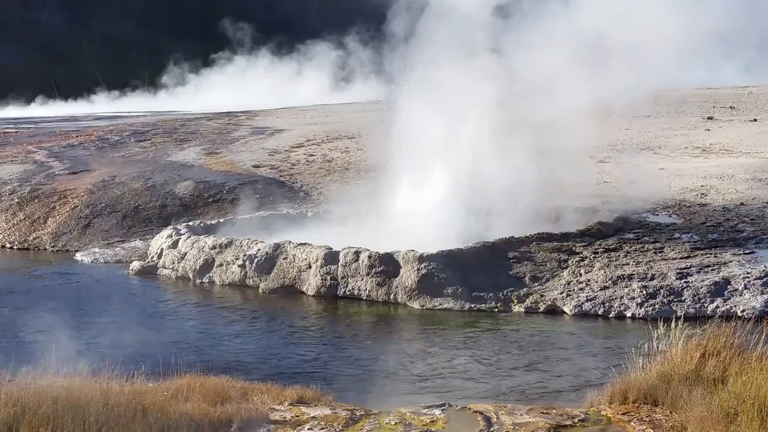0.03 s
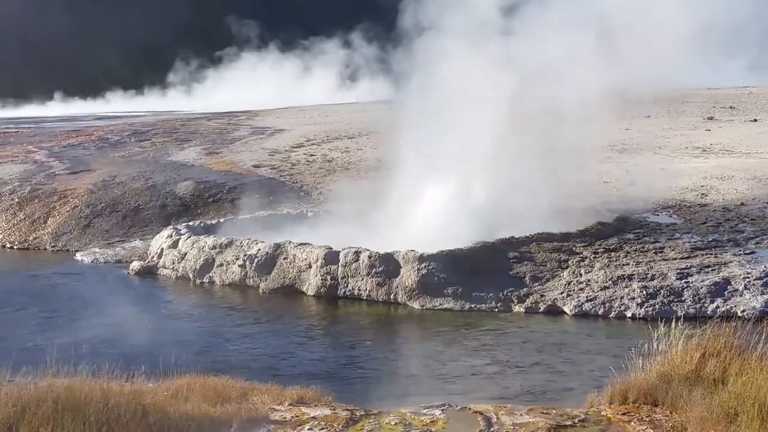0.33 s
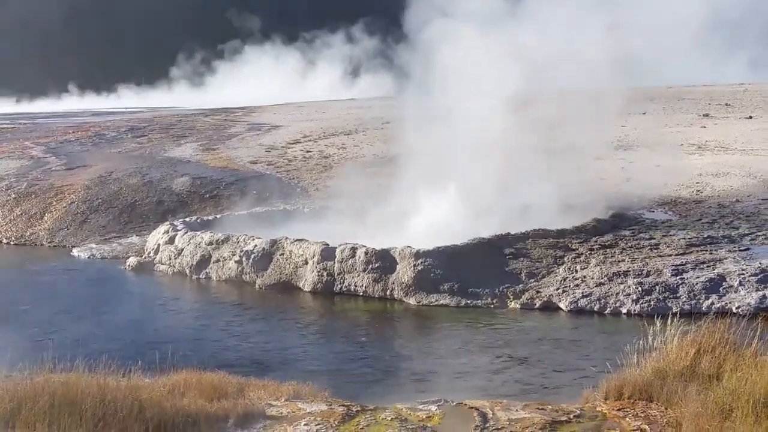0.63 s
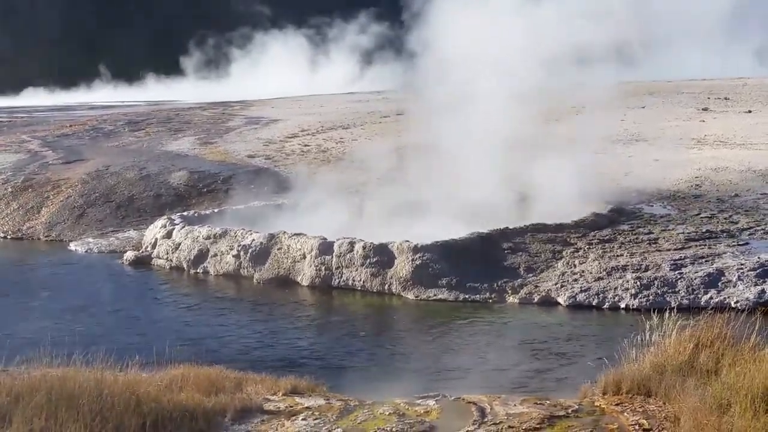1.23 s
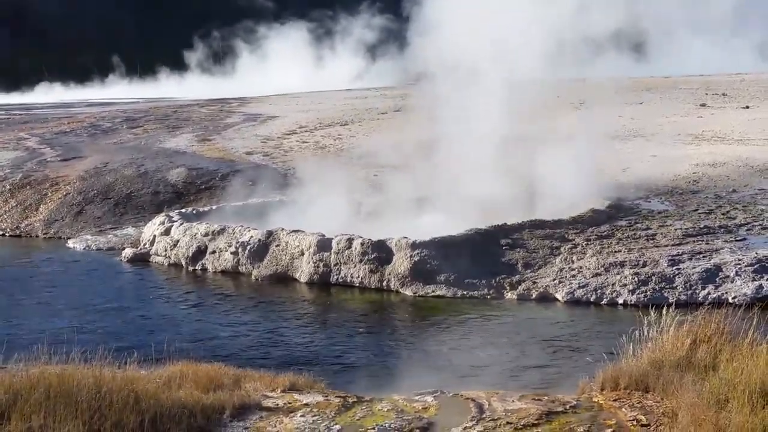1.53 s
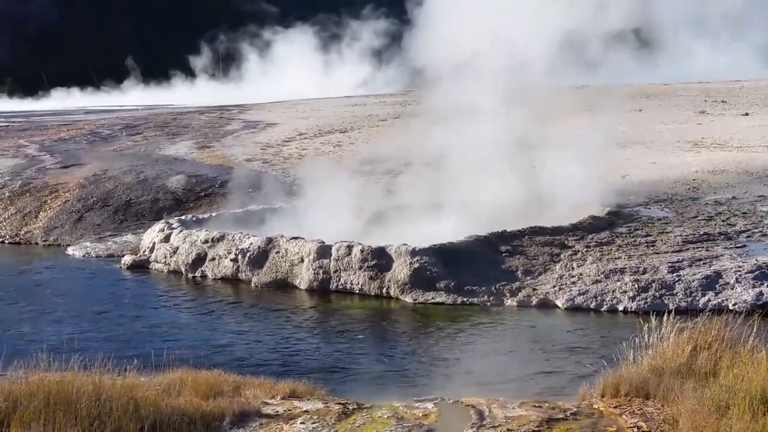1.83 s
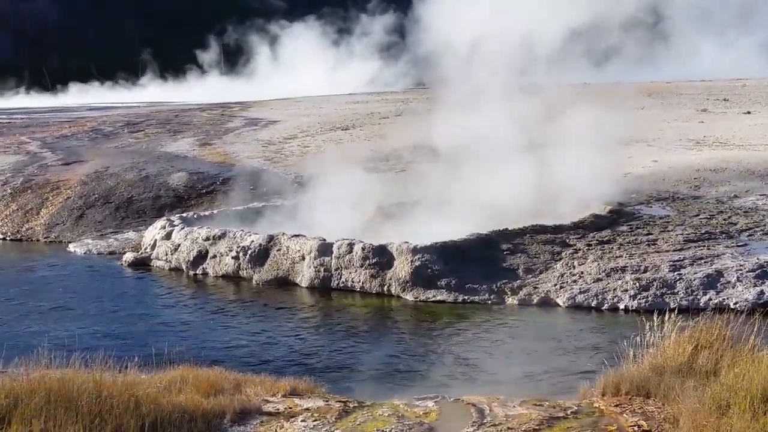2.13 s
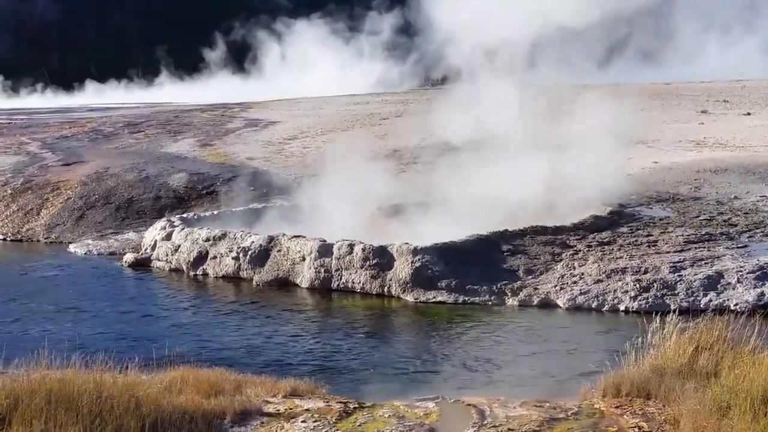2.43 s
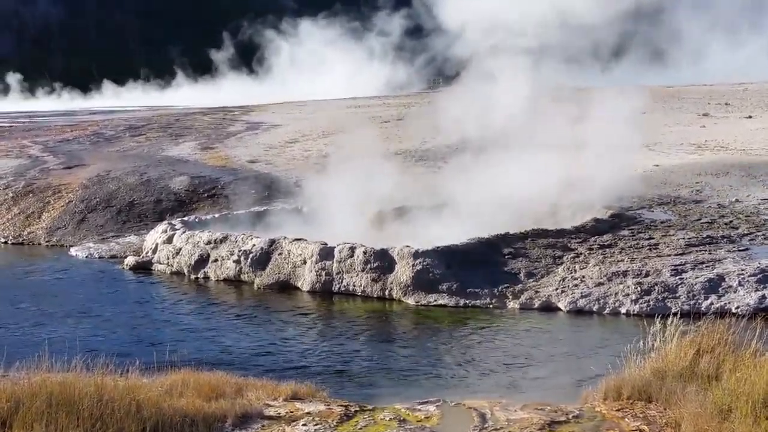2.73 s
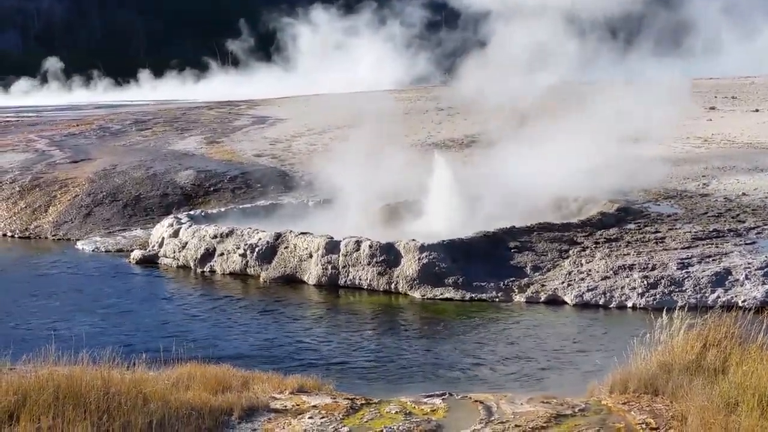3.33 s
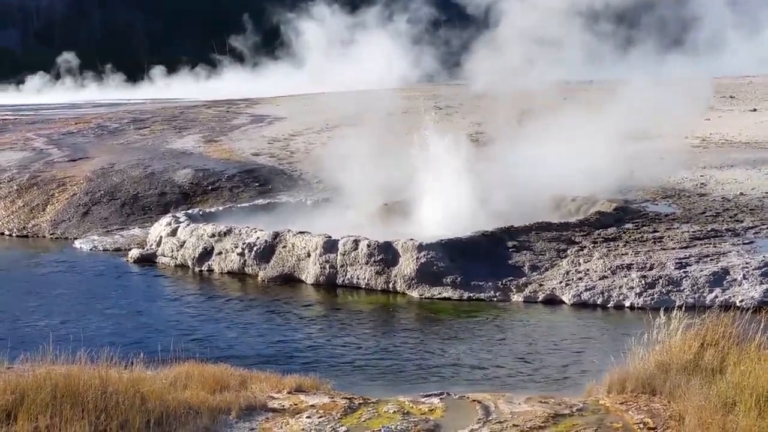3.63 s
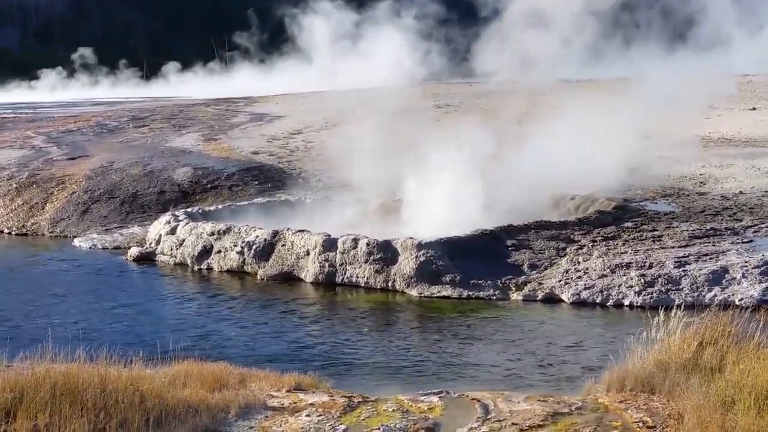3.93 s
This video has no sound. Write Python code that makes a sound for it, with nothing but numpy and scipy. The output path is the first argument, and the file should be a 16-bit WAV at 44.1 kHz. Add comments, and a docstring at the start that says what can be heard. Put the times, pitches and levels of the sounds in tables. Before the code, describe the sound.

A small geyser fades in at about 0.4 seconds, boiling and gurgling with irregular low thuds over a low drone and light wind. Bubbly water rushes throughout, mostly on the left, with splashes around 0.8 to 1.1 seconds. A thin, high sizzle with a few sharp ticks swells and sinks on the right. Near 3.3 seconds a jet throws up hissing spray, and water splashes down until 4 seconds.

```python
"""A small geyser boils in its pool beside a river, in the open; the sound fades in out of silence.
Steam pockets collapse under the water and thud over a low, steady drone and a light wind.
Water full of tiny bubbles rushes and splashes mostly on the left, and jets throw up hissing spray.
A thin, very high sizzle with a few sharp ticks swells and sinks on the right."""
import sys
import numpy as np
from scipy import signal
from scipy.fft import rfft, irfft, next_fast_len
from scipy.io import wavfile
from scipy.ndimage import uniform_filter1d, map_coordinates

SR = 44100
rng = np.random.default_rng(int(sys.argv[2]) if len(sys.argv) > 2 else 0)


def unload_audio(sound):
    """Save the sound as a 16-bit wav file, at the path given as the first command line argument."""
    columns = np.transpose(np.atleast_2d(sound))
    # keep every value between -1 and 1, then stretch to whole-number steps
    steps = np.round(np.clip(columns, -1, 1) * 32767)
    wavfile.write(sys.argv[1], SR, steps.astype(np.int16))


N = 176400


def amp(db):
    """Turn decibels into a gain."""
    return 10 ** (np.asarray(db) / 20)


def unit(x):
    """Scale to an average (rms) level of 1."""
    return x / np.sqrt(np.mean(x ** 2) + 1e-20)


def along(points, hz):
    """Read between (freq_hz, value) points on a log scale."""
    freqs, values = np.transpose(points)
    return np.interp(np.log(hz + 1), np.log(freqs + 1), values)


def curves(rows):
    """Join timed rows into one line per column."""
    times, *columns = np.transpose(rows)
    return [np.interp(np.arange(N) / SR, times, column) for column in columns]


def wobble(per_s):
    """A smooth curve through per_s random values a second."""
    return map_coordinates(rng.standard_normal(1024), [np.arange(N) * per_s / SR + 2], mode="wrap")


def filtered(x, response):
    """Give each frequency the gain response(hz)."""
    size = next_fast_len(N + SR // 2)
    return irfft(rfft(x, size) * response(np.fft.rfftfreq(size, 1 / SR)), size)[..., :N]


def shaped(x, tone):
    """Filter by a (freq_hz, gain_db) table."""
    return filtered(x, lambda hz: amp(along(tone, hz)))


def noise(tone):
    """Two separate noises with the same tone."""
    return unit(shaped(rng.standard_normal((2, N)), tone))


def spread(pair, likeness):
    """Blend two unrelated sounds into a partly alike left and right."""
    def blend(hz):
        angle = np.arccos(np.clip(along(likeness, hz), -.999, .999)) / 2
        return np.array([np.cos(angle), np.sin(angle)])
    mid, side = filtered(pair, blend)
    return np.array([mid + side, mid - side])


def patchy(depth_db):
    """Two noises that share random louder and softer patches."""
    cells = signal.stft(rng.standard_normal((2, N)), nperseg=512)[2]
    patches = uniform_filter1d(rng.standard_normal(cells.shape[1:]), size=5, axis=0)
    patches = unit(uniform_filter1d(patches, size=7, axis=1))
    return unit(signal.istft(cells * amp(depth_db * patches), nperseg=512)[1][:, :N])


def resonant(hz, width_hz, size=N):
    """Noise that rings around one pitch."""
    f = np.fft.rfftfreq(size, 1 / SR)
    resonance = 1j * f * width_hz / (hz * hz - f * f + 1j * f * width_hz)
    return unit(irfft(rfft(rng.standard_normal(size)) * resonance ** 2, size))


def decay(t, length):
    """Die away by 60 dB over the given length."""
    return np.exp(-np.log(1000) * t / length)


def bubbles(per_s, low_hz, high_hz, cycles, scatter_db, size):
    """Bubbles ring briefly, each with a random time, pitch and strength."""
    when, pitch, strength, flip = rng.random((4, int(per_s * N / SR), 1))
    hz = low_hz * (high_hz / low_hz) ** pitch
    turns = hz * np.arange(size) / SR
    gain = amp(-scatter_db * np.log(np.maximum(strength, .02))) * np.sign(flip - .5)
    rings = gain * np.sin(2 * np.pi * turns) * decay(turns, cycles) * (1 - np.exp(-2 * turns))
    at = (when * N).astype(int) + np.arange(size)
    return unit(np.bincount(at.ravel(), rings.ravel(), N)[:N])


def add(track, start_s, sound):
    """Mix a sound into a track."""
    part = track[max(round(start_s * SR), 0):][:len(sound)]
    part += sound[:len(part)]


# The wind's deep tone: freq_hz, gain_db
WIND_TONE = [(15, -7.5), (35, -1), (55, 6.5), (100, -3.5), (200, -11.5), (500, -42.5), (1500, -79.5)]

def wind():
    """A light wind buffets each side separately."""
    gusts = amp(2.5 * np.array([wobble(9), wobble(3)]))
    return amp([[-48.5], [-50]]) * gusts * noise(WIND_TONE)


# The drone's slow drift: time_s, pitch_hz, level_db
DRONE_DRIFT = [(.5, 89.5, -42), (1.1, 89.7, -41.5), (1.7, 90.3, -38.5), (2.15, 92.5, -36), (3.0, 91.3, -38),
               (3.8, 91.8, -37.5), (4.0, 94.5, -42.5)]

def drone():
    """One low tone wavers slightly."""
    hz, db = curves(DRONE_DRIFT)
    phase = 2 * np.pi * np.cumsum(hz + 0.76 * wobble(7.17)) / SR
    return unit(np.sin(phase)) * amp(db + 0.66 * wobble(10)) * amp([[-.8], [.8]])


# How the sizzle swells: time_s, relative_db
SIZZLE_SWELL = [(0.7, -49.5), (0.86, -55), (1.32, -71.5), (2.32, -65), (2.38, -62.5), (2.4, -66.5),
                (2.93, -74), (3.13, -73), (3.4, -55.5), (3.5, -61.5), (3.69, -65), (3.98, -56)]
# Sharp ticks: start_s, relative_db
TICK_HITS = [(.985, -35), (1.572, -41), (1.995, -45.5), (2.379, -45), (2.551, -40.5), (2.658, -41.5),
             (3.449, -26.5), (3.453, -21.5), (3.456, -34)]
# Tones of the sizzle and the ticks: freq_hz, gain_db
SIZZLE_TONE = [(3000, -69), (7500, -41.5), (9500, -36), (10300, -19.5), (11200, -5), (12200, 6),
               (15700, 2.5)]
TICK_TONE = [(3000, -74), (7500, -43.5), (9700, -40.5), (11200, -5.5), (13000, -4), (15500, -7)]

def sizzle():
    """A thin hiss crackles and ticks on the right; it is smoother and fainter on the left."""
    level_db, = curves(SIZZLE_SWELL)
    swell_db = level_db - level_db.mean()
    hiss = unit(shaped(patchy(depth_db=0.5), SIZZLE_TONE))
    left = hiss[0] * amp(-68.5 + 0.54 * swell_db)
    right = hiss[1] * amp(level_db + 7.5 + 1.2 * wobble(78))
    grains = bubbles(220, low_hz=11000, high_hz=15000, cycles=22, scatter_db=3.5, size=200)
    crackle = amp(-69.5 + .5 * swell_db) * unit(shaped(grains, SIZZLE_TONE))
    ticks, t = np.zeros(N), np.arange(SR // 20) / SR
    for start_s, db in TICK_HITS:
        add(ticks, start_s, amp(db) * rng.standard_normal(len(t)) * decay(t, 0.026))
    ticks = shaped(ticks, TICK_TONE)
    return np.array([left + amp(-25.5) * ticks, right + crackle + ticks])


def drop():
    """One nearby drop lands with a dry tick on the left."""
    out, t = np.zeros(N), np.arange(SR // 20) / SR
    tick = resonant(hz=2650, width_hz=550, size=len(t)) * decay(t, .028) * (1 - np.exp(-t / .002))
    add(out, start_s=3.026, sound=tick)
    return out * amp([[-41], [-52]])


# How strongly the water rushes: time_s, relative_db
FLOW_SWELL = [(.55, -57.5), (0.9, -59.5), (0.97, -57), (1.09, -57), (2.41, -55), (2.89, -57), (3.26, -56.5),
              (3.42, -54.5), (3.69, -56), (4.0, -54)]
# Its tone on each side: freq_hz, gain_db
LEFT_TONE = [(200, -23), (550, -5), (850, 0.5), (1350, -2), (1800, -5.5), (2120, -8), (2550, 0.5),
             (3050, -6.5), (3400, -2), (3680, -5), (3980, -8.5), (4400, -5.5), (4900, -10.5), (5300, -19),
             (6100, -18), (6900, -38.5), (7600, -47.5), (10000, -40.5), (12000, -67.5)]
RIGHT_TONE = [(200, -26), (550, -8), (850, -3), (1300, -8), (1750, -10.5), (2200, -14.5), (2550, -10),
              (3100, -19.5), (4100, -21), (5300, -32.5), (6000, -36), (7000, -41.5), (10000, -44),
              (12000, -59.5)]
# How alike the sides are: freq_hz, likeness (0 to 1)
RUSH_LIKENESS = [(300, 0), (750, .78), (1250, 0.42), (1900, 0), (3000, 0.068), (6000, 0)]
# Narrow microphone resonances that colour the rushing water on the left: pitch_hz, width_hz, level_db
MIC_RESONANCES = [(1804, 220, -63), (2495, 330, -65.5), (4021, 313, -59)]

def rushing(surge):
    """Falling and flowing water hisses, thick with tiny bubbles."""
    flow_db, = curves(FLOW_SWELL)
    spatter = [bubbles(1100, low_hz=500, high_hz=6500, cycles=12, scatter_db=3, size=600)
               for _ in range(2)]
    spatter = unit(shaped(spatter, [(400, -23.5), (6500, -10)]))
    bubble_share = 0.12
    froth = np.sqrt(1 - bubble_share) * rng.standard_normal((2, N)) + np.sqrt(bubble_share) * spatter
    left, right = spread(froth, RUSH_LIKENESS)
    water = unit(np.array([shaped(left, LEFT_TONE), shaped(right, RIGHT_TONE)]))
    water *= amp(flow_db + 2.5 + surge * np.array([[.6], [1]]))
    mic_colour = sum(amp(db) * resonant(hz, width_hz) for hz, width_hz, db in MIC_RESONANCES)
    water[0] += amp(flow_db - flow_db.mean()) * mic_colour
    return water


# Water splashing back down: peak_s, length_s, level_db, pitch_hz, width_hz
FALLING_WATER = [(0.77, 0.2, -56.5, 820, 533), (1.083, .1, -58.5, 750, 400), (2.9, 0.1, -70, 875, 416.7),
                 (3.44, 0.055, -53.5, 1150, 756), (3.9, 0.12, -58, 1293, 600)]

def gushes():
    """Each mass of falling water swells and sinks with its own hollow tone."""
    out, t = np.zeros(N), np.arange(SR // 2) / SR - .25
    for peak_s, length_s, db, hz, width_hz in FALLING_WATER:
        swell = amp(db) * np.exp(-(2 * t / length_s) ** 2)
        add(out, peak_s + t[0], swell * resonant(hz, width_hz, size=len(t)))
    return out * amp(1.5 * wobble(45)) * amp([[1.5], [-1.5]])


# The first jet's hollow ring: time_s, pitch_hz, level_db
RING_ARCH = [(.5, 1288, -60), (.68, 1415, -58.5), (.87, 1602, -61), (1.0, 1400, -57), (1.15, 1228, -72.5),
             (1.3, 1215, -100)]

def jet_ring(width_hz=180):
    """A narrow band of splashing rises and falls in pitch with the first jet."""
    hz, db = curves(RING_ARCH)
    flutter = filtered(rng.standard_normal((2, N)), lambda f: 1 / (1 + (f / width_hz) ** 2))
    phase = 2 * np.pi * np.cumsum(hz) / SR
    ring = unit(flutter[0] * np.cos(phase) + flutter[1] * np.sin(phase))
    return amp(db) * ring * amp([[2], [-2]])


# Spray thrown up by the jets: time_s, left_level_db
SPRAY_SWELL = [(.5, -71), (.9, -67.5), (1.3, -84.5), (1.9, -81.5), (2.33, -67.5), (2.8, -83.5), (3.1, -88),
               (3.27, -60.5), (3.4, -56.5), (3.455, -58), (3.5, -65), (3.8, -69.5)]
# Its tone: freq_hz, gain_db
SPRAY_TONE = [(1500, -42), (3500, -1.5), (4500, 3.5), (6200, -2), (7000, -12.5), (7700, -34.5),
              (11000, -51)]

def jet_spray():
    """Each jet hisses as it rises, mostly on the left."""
    level_db, = curves(SPRAY_SWELL)
    return amp(level_db) * noise(SPRAY_TONE) * amp([[0], [-16]])


# Large steam pockets: start_s, level_db, pitch_hz
BIG_POCKETS = [(.592, -30, 144), (0.737, -37, 157), (0.87, -25.5, 139), (0.891, -22, 85.2),
               (1.079, -29, 266.6), (1.38, -30.5, 202), (1.529, -26, 195), (1.847, -24.5, 144),
               (1.998, -26.5, 194.5), (2.125, -29, 130.7), (2.5, -30.5, 131.6), (3.124, -33, 152.7),
               (3.25, -27.5, 130), (3.463, -37.5, 110), (3.491, -32, 168), (3.51, -27.5, 335),
               (3.531, -28, 80.7), (3.891, -30.5, 141.6)]

def steam_thuds(ring_cycles=12.6, attack_s=0.0026):
    """Each large steam pocket collapses with a low ring and a faint splash."""
    out, t = np.zeros(N), np.arange(SR // 5) / SR
    splash_tone = [(100, -17.5), (300, -0.5), (900, 11.5), (2000, -21.5), (6000, -61)]
    splash = amp(-28.5) * noise(splash_tone)[0]
    for start_s, db, hz in BIG_POCKETS:
        thud = np.sin(2 * np.pi * hz * t) + np.roll(splash, -round(start_s * SR))[:len(t)]
        add(out, start_s, amp(db) * thud * decay(t, ring_cycles / hz) * (1 - np.exp(-t / attack_s)))
    return out


# How hard the pool boils: time_s, relative_db
BOIL_SWELL = [(.5, -44.5), (.84, -44.5), (0.97, -42), (1.15, -44.5), (1.61, -41.5), (1.75, -43),
              (1.8, -42.5), (2.88, -41.5), (2.99, -47), (3.14, -39.5), (3.38, -45), (3.48, -39),
              (3.81, -42.5), (3.91, -40), (4.0, -44.5)]
# Tone of the churning: freq_hz, gain_db
CHURN_TONE = [(15, -24), (35, -4.5), (55, -4.5), (75, -1.5), (115, 2), (190, -4.5), (260, -11), (350, -13),
              (480, -22), (800, -30), (2000, -55.5), (5000, -94)]
# Which side is louder: freq_hz, left_minus_right_db
BOIL_BALANCE = [(30, -7.5), (65, -11.5), (95, -1.5), (200, -2), (400, -0.5)]
# How alike the sides are: freq_hz, likeness (0 to 1)
BOIL_LIKENESS = [(25, 0.43), (70, 0.93), (150, 1), (500, 0.79)]

def boiling(surge):
    """The pool churns and gurgles with small steam pockets while large ones thud."""
    level_db, = curves(BOIL_SWELL)
    churn = unit(spread(noise(CHURN_TONE), BOIL_LIKENESS))
    pockets = [bubbles(28, low_hz=88, high_hz=250, cycles=5.7, scatter_db=2, size=3000)
               for _ in range(2)]
    pockets = unit(spread(pockets, BOIL_LIKENESS))
    gurgle = bubbles(140, low_hz=227, high_hz=453, cycles=6.6, scatter_db=2, size=1500)
    rumble = amp(level_db + 1.13 * surge) * (amp(1) * churn + amp(-5) * pockets + amp(-18) * gurgle)
    sides = np.array([[.5], [-.5]])
    return filtered(rumble + steam_thuds(), lambda hz: amp(along(BOIL_BALANCE, hz) * sides))


def scene():
    """Mix everything; the same quick surges drive the boiling and the rushing water."""
    surge = wobble(21.705)
    splashing = rushing(surge) + gushes() + jet_ring() + jet_spray()
    lead_s = .0001  # the splashing reaches the left side first
    splashing = filtered(splashing, lambda hz: np.exp(1j * np.pi * hz * lead_s * np.array([[1], [-1]])))
    return wind() + drone() + sizzle() + drop() + splashing + boiling(surge)


def record(dry):
    """Fade in from silence and cut the very highest treble."""
    start_s, fade_s, top_hz = 0.38, 0.46, 15800
    fade = np.clip((np.arange(N) / SR - start_s) / fade_s, 0, 1)
    return filtered(dry * fade, lambda hz: np.clip((top_hz - hz) / 100 + .5, 0, 1))


dry = scene()
out = record(dry)
unload_audio(out)
```